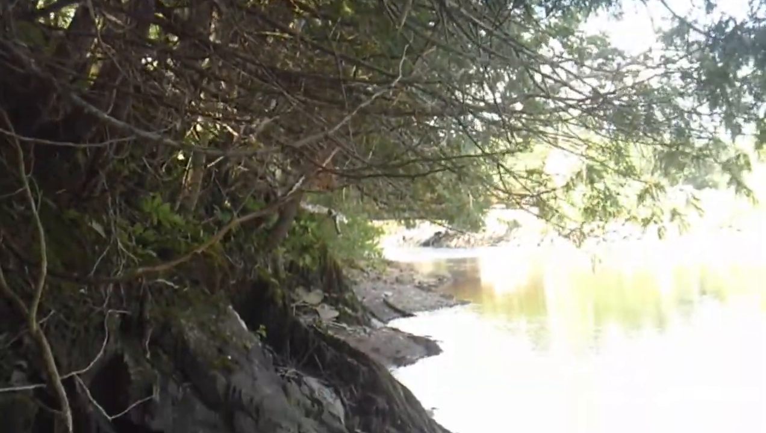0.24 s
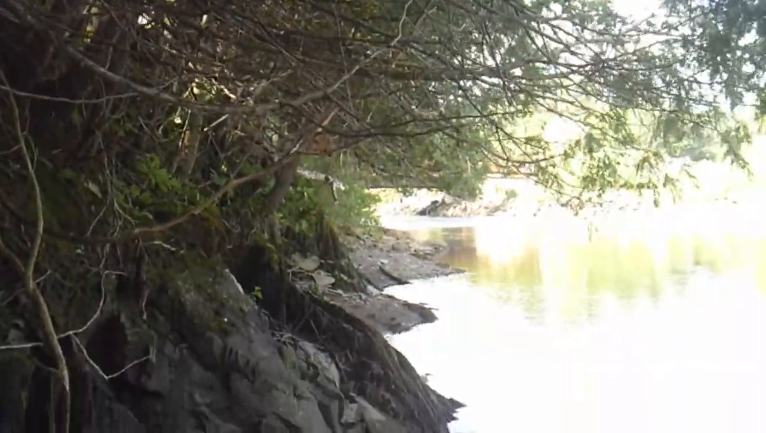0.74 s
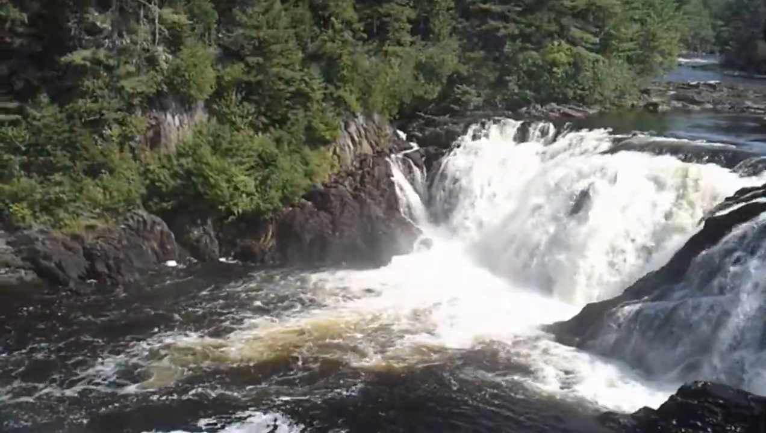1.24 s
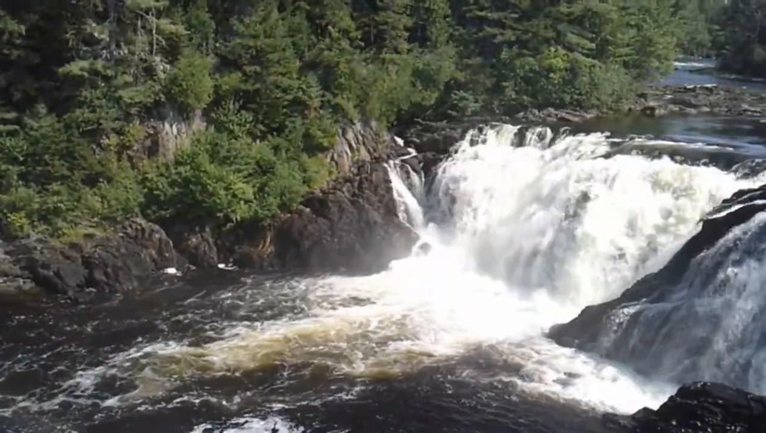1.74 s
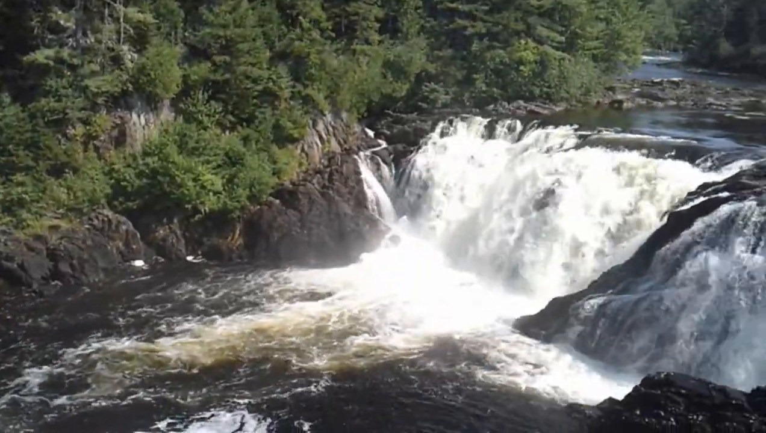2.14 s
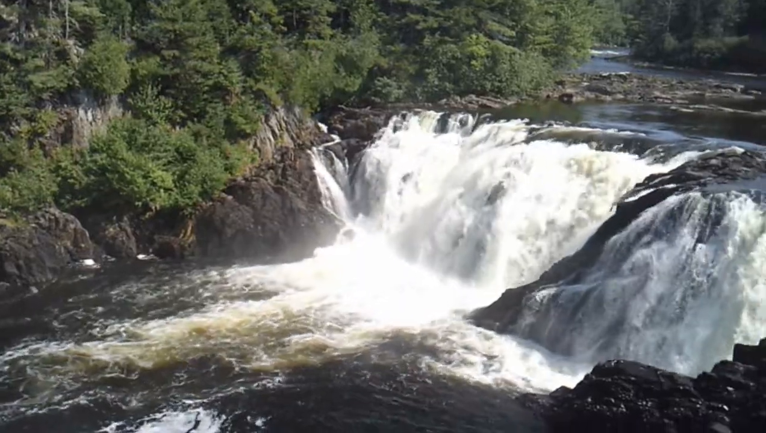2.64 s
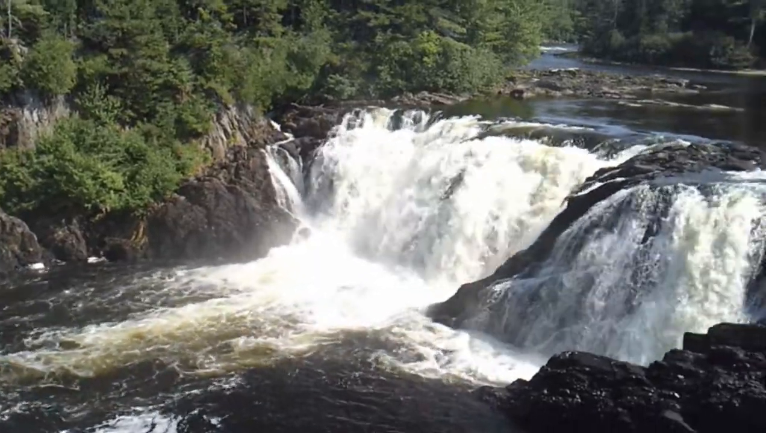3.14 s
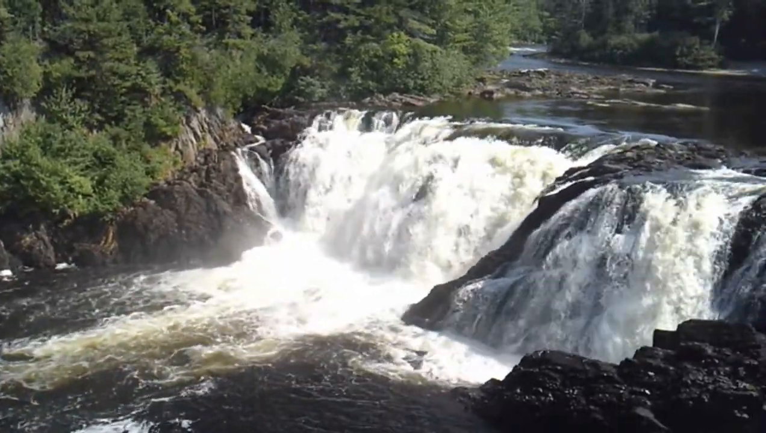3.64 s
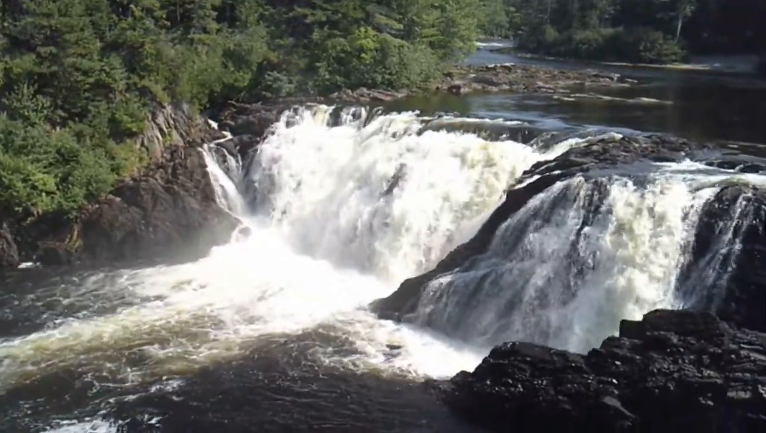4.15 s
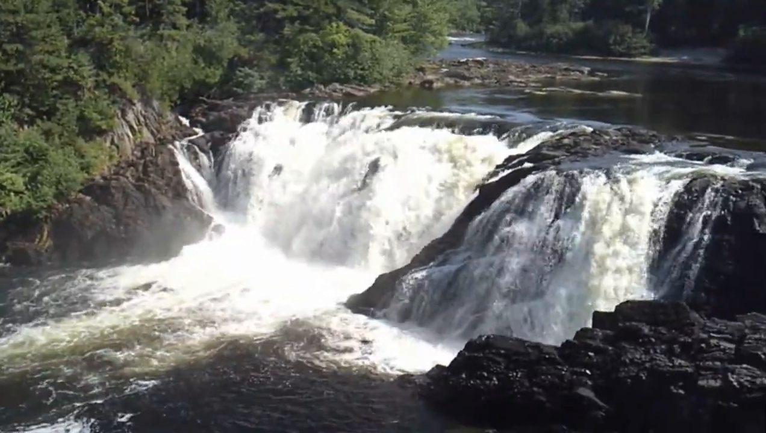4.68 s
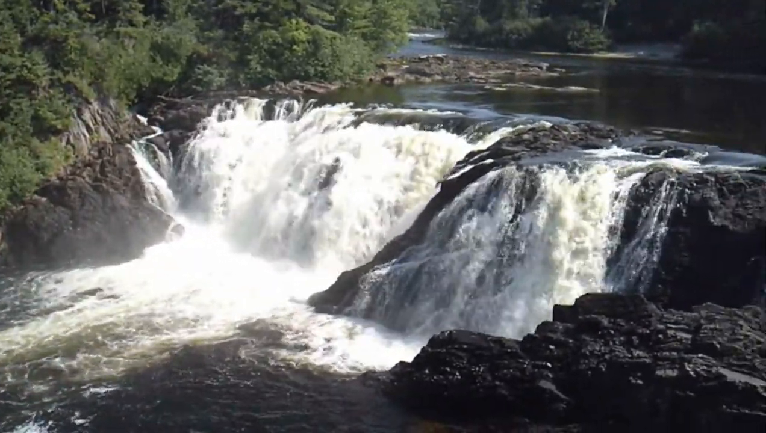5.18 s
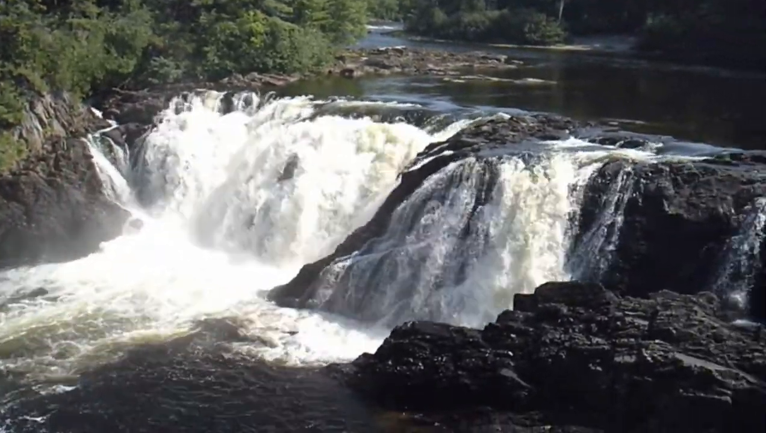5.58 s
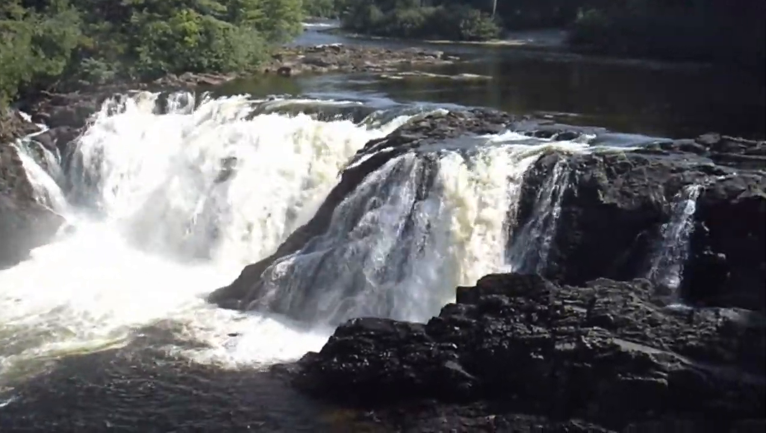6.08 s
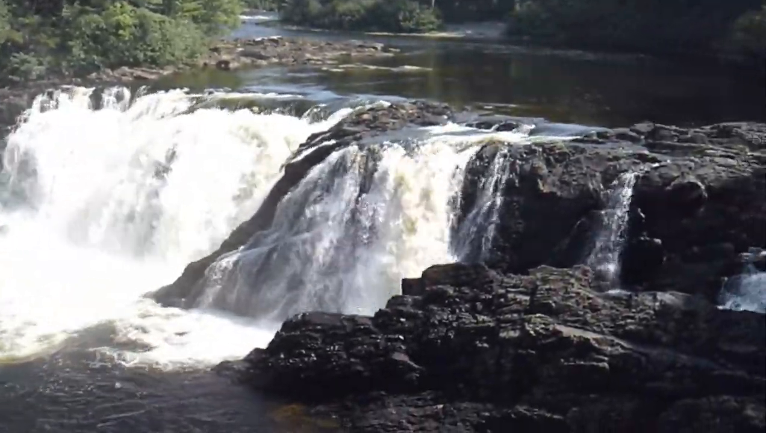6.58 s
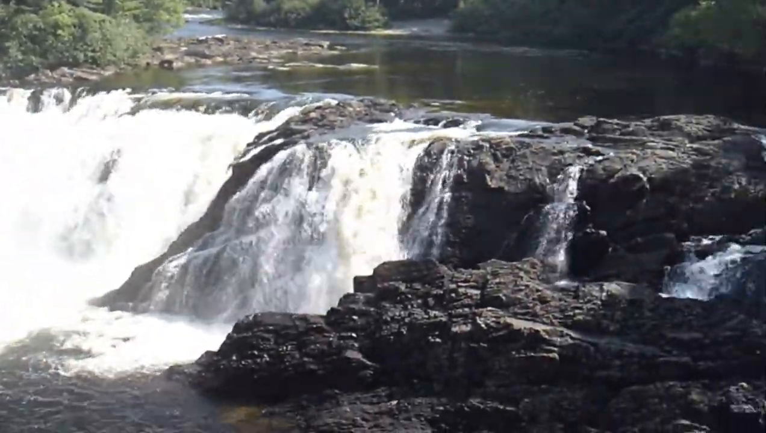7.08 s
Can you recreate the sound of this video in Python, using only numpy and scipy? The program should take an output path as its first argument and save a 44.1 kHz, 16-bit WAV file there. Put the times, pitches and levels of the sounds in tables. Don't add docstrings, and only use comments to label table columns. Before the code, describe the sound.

From 0 to 1.07 s the sound is a very quiet wooded riverbank. A cricket trills thinly near 3.8 kHz, pulsing about fifty times a second and dipping slightly around 0.55 s, with blurred crickets a little higher behind it. Distant rapids murmur steadily over a barely audible low hum. At 0.46 s a soft, hollow low knock on the microphone dies within 0.2 s; light wind rumble swells around 0.6 s, with tiny puffs near 0.9 and 1.05 s. At 1.07 s it cuts instantly to a huge close waterfall roar, dense and noisy, clipping raspily until about 1.26 s. Automatic gain then drops it about 5 dB there and again near 2.5, 3.8 and 4.9 s, with a smaller drop at 6 s. The steady rush gains bass after 5 s and continues to the end, nearly mono, with treble cut above about 6 kHz.

```python
import sys
import numpy as np
from scipy import signal
from scipy.fft import rfft, irfft
from scipy.io import wavfile
from scipy.ndimage import uniform_filter1d

SR = 44100
rng = np.random.default_rng(int(sys.argv[2]) if len(sys.argv) > 2 else 0)


def magnitude_from_level(level_db):
    exponent = np.asarray(level_db, float) / 20
    return 10 ** exponent


def file_out(sig):
    cols = np.atleast_2d(sig).T
    lim = np.clip(cols, -1, 1)
    pcm = np.round(lim * 32767).astype(np.int16)
    wavfile.write(sys.argv[1], SR, pcm)


N = 322812
CUT_S = 1.0714

# pitch_hz [Hz], level_db [dB per Hz]
FALL_SPECTRUM = [(35, -54), (60, -26), (295, -4.5), (427, -3), (618, -0.5), (981, -2), (2170, -7),
                 (3270, -7), (4080, -10.5), (4640, -7.5), (5000, -10.5), (6500, -38), (11000, -120)]
# pitch_hz [Hz], level_db [dB per Hz]
RAPIDS_SPECTRUM = [(24, -30), (45, -9), (110, -19), (170, -14), (260, -15.5), (372, -8.5), (560, -4),
                   (700, -4.5), (790, 1.5), (900, -6.5), (1090, -7.5), (1880, -14.5), (3400, -17.5)]
# pitch_hz [Hz], level_db [dB]
MICROPHONE_RESPONSE = [(5000, 1), (5300, -4), (5600, -12.5), (5900, -18.5), (6150, -29.5), (6280, -41),
                       (6400, -100)]
# time_s [s], share turned toward the plunge pool [0-1]
POOL_AIM = [
    (1.07, 0.12),
    (2.2, 0.36),
    (4.7, 0.05),
    (5.2, 0.63),
    (7.32, 1),
]
# start_s [s], change_db [dB], ramp_s [s]
GAIN_STEPS = [
    (1.256, -5.5, 0.0046),
    (2.525, -4.5, 0.019),
    (3.805, -5, 0.018),
    (4.89, -5, 0.049),
    (5.975, -3.5, .04),
]
# start_s [s], change [full scale]
OFFSET_STEPS = [
    (2.531, .0008),
    (3.82, .0005),
]
# low_hz [Hz], high_hz [Hz], level_db [dB], how often [drift spreads]
MISMATCH_BANDS = [(2700, 3400, -25.5, -1.2), (4770, 5200, -33.5, -.9), (5190, 5700, -23, .1),
                  (5700, 6250, -16.5, .2), (10, 130, -24.5, -.8), (6600, 9900, -10, -.3)]
# peak_s [s], level_db [dB], time to fall by 10 dB fall_s [s]
WIND_PUFFS = [
    (.63, -54, .11),
    (.91, -66, .03),
    (1.05, -64, .04),
]
# pitch_hz [Hz], width_hz [Hz], level_db [dB]
CHORUS_BANDS = [(3910, 110, 6), (4000, 116, 0)]


def rms_one(x):
    return x / np.sqrt(np.mean(x ** 2) + 1e-20)


def in_time(rows):
    s, *columns = np.transpose(rows)
    return [np.interp(np.arange(N) / SR, s, c) for c in columns]


def coloured(x, points):
    hz = np.maximum(np.fft.rfftfreq(N, 1 / SR), 1)
    point_hz, point_db = np.transpose(points)
    return irfft(rfft(x) * magnitude_from_level(np.interp(np.log(hz), np.log(point_hz), point_db)), N)


def drift(rate):
    r = np.exp(-80 * np.pi * rate / SR)
    slow = signal.lfilter([1], [1, -2 * r, r * r], rng.standard_normal(N // 40 + 2002))[2000:]
    return np.interp(np.arange(N) / 40, np.arange(len(slow)), rms_one(slow))


def band_pass(x, order, low_hz, high_hz):
    return signal.sosfilt(signal.butter(order, [low_hz, high_hz], "band", fs=SR, output="sos"), x)


def resonate(x, hz, width_hz):
    r = np.exp(-np.pi * width_hz / SR)
    poles = [1, -2 * r * np.cos(2 * np.pi * hz / SR), r * r]
    return signal.lfilter([(1 - r * r) / 2, 0, (r * r - 1) / 2], poles, x)


def whitewater(spectrum, shared_db, own_db, splash_db):
    octave = np.log2(np.maximum(np.fft.rfftfreq(N, 1 / SR), 1) / 30)
    white = rfft(rng.standard_normal(N))
    together = drift(4.9)
    out = 0
    for centre in np.arange(0, 8.6, .5):
        band = np.cos(np.pi * np.clip(octave - centre, -.5, .5)) ** 2
        swell_db = shared_db * together + own_db * drift(7.2) + splash_db * drift(44.0)
        out = out + magnitude_from_level(swell_db) * irfft(white * band, N)
    return rms_one(coloured(out, spectrum))


def waterfall():
    surge_db = -0.75 * np.exp(-np.abs(np.arange(N) / SR - CUT_S) / 0.4)
    bass_db = -0.5 + 6 * in_time(POOL_AIM)[0]
    roar = whitewater(FALL_SPECTRUM[:-2], shared_db=0.37, own_db=.5, splash_db=.5)
    bass = coloured(roar, [(50, -20), (90, 1), (180, 1), (350, -25)])
    return magnitude_from_level(-9.5 + surge_db) * (roar + (magnitude_from_level(bass_db) - 1) * bass)


def cricket():
    strokes_per_s, wing_hz, wing_width_hz = 52.63, 3778, 80
    t = np.arange(N) / SR
    cycle = strokes_per_s * t + .08 + 0.043 * drift(8.0)
    stroke = np.maximum(np.cos(2 * np.pi * cycle) + 0.16, 0) * magnitude_from_level(drift(25.0))
    teeth = np.sin(2 * np.pi * np.cumsum(wing_hz + 22 * drift(40.0)) / SR)
    scrape = stroke * (teeth + .4 * rng.standard_normal(N))
    wing = resonate(resonate(scrape, wing_hz, wing_width_hz), wing_hz, 2 * wing_width_hz)
    lull = np.exp(-((t - .55) / .3) ** 2)
    return magnitude_from_level(-54 - 2 * lull) * rms_one(wing)


def knock():
    start_s, level_db, pitch_hz, t60_s = .457, -41.5, 188, .2
    t = np.maximum(np.arange(N) / SR - start_s, 0)
    onset = 1 - np.exp(-t / .005)
    return magnitude_from_level(level_db - 60 * t / t60_s) * np.sin(2 * np.pi * pitch_hz * t) * onset


def wind():
    t = np.arange(N) / SR
    rumble = band_pass(rng.standard_normal(N), 2, 25, 150)
    puffs = sum(magnitude_from_level(level_db - 10 * ((t - peak_s) / fall_s) ** 2) for peak_s, level_db, fall_s in WIND_PUFFS)
    return puffs * rms_one(rumble * magnitude_from_level(1.5 * drift(15.0)))


def chorus():
    noise = magnitude_from_level(1.5 * drift(40.0)) * rng.standard_normal(N)
    band = 0
    for hz, width_hz, level_db in CHORUS_BANDS:
        band = band + magnitude_from_level(level_db) * resonate(resonate(noise, hz, width_hz), hz, 2 * width_hz)
    return magnitude_from_level(-59.5) * rms_one(band)


def rapids():
    far = RAPIDS_SPECTRUM + [(5000, -17.5), (9000, -18)]
    return magnitude_from_level(-48) * whitewater(far, shared_db=-0.3, own_db=0.5, splash_db=-1.5)


def hollow_hum():
    pitch_hz, width_hz = 232, 6.1
    hum = resonate(resonate(rng.standard_normal(N), pitch_hz, width_hz), pitch_hz, width_hz)
    return magnitude_from_level(-70) * rms_one(hum)


def overload(x):
    limit, knee = .74, 11
    clipped = x / (1 + np.abs(x / limit) ** knee) ** (1 / knee)
    start_s, _, ramp_s = GAIN_STEPS[0]
    return np.where(np.arange(N) / SR < start_s + ramp_s, clipped, x)


def patchy_rasp(x):
    edges_hz = np.geomspace(6600, 14000, 10)
    span = slice(SR, 3 * SR // 2)
    x = x.copy()
    for k, band_hz in enumerate(zip(edges_hz, edges_hz[1:])):
        band = signal.sosfiltfilt(signal.butter(3, band_hz, "band", fs=SR, output="sos"), x[span])
        kept = np.clip(2 * (drift(14.0) + 1.5 - .17 * k), 0, 1)
        x[span] += (magnitude_from_level(0.5) * kept[span] - 1) * band
    return x


def blips(gain_db):
    per_s, level_db, spread_db, gain_share = 4.5, -42.5, 3, 0.43
    draw = rng.random((40, 3))
    s = CUT_S + np.cumsum(.15 + 1.7 * draw[:, 0]) / per_s
    height = np.sign(draw[:, 1] - .45) * magnitude_from_level(spread_db * (2 * draw[:, 2] - 1))
    inside = s < N / SR
    out = np.zeros(N)
    out[(s[inside] * SR).astype(int)] = height[inside]
    return np.convolve(out * magnitude_from_level(level_db + gain_share * gain_db), np.hanning(400), "same")


def resting_level():
    t = np.arange(N) / SR
    return -.0027 + sum(change * (t > start_s) for start_s, change in OFFSET_STEPS)


def clock_whine():
    t = np.arange(N) / SR
    heard = (t < CUT_S) | ((t > 4.95) & (drift(30.0) > -.2))
    return magnitude_from_level(-87) * uniform_filter1d(1.0 * heard, size=400) * np.sin(np.pi / 2 * np.arange(N))


def mismatch(x):
    out = 0
    for low_hz, high_hz, level_db, often in MISMATCH_BANDS:
        band = band_pass(x, 4, low_hz, high_hz)
        patch = np.clip(3.0 * (drift(17.0) + often), 0, 1)
        out = out + magnitude_from_level(level_db + 4.0 * drift(6.0)) * patch * np.roll(band, 200)
    return out


def scene():
    fall = waterfall()
    bank = cricket() + knock() + wind() + chorus() + rapids() + hollow_hum()
    return np.array([coloured(bank, MICROPHONE_RESPONSE), coloured(fall, MICROPHONE_RESPONSE)])


def top_cut(x):
    return signal.sosfilt(signal.butter(12, 13200, fs=SR, output="sos"), x)


def record(dry):
    t = np.arange(N) / SR
    gain_db = sum(db * np.clip((t - start_s) / ramp_s, 0, 1) for start_s, db, ramp_s in GAIN_STEPS)
    x = np.where(t < CUT_S, dry[0], dry[1]) * magnitude_from_level(gain_db)
    x = patchy_rasp(overload(x))
    x = x + resting_level() + blips(gain_db) + clock_whine()
    side = mismatch(x)
    return top_cut(np.array([x + side, x - side]))


dry = scene()
out = record(dry)
file_out(out)
```